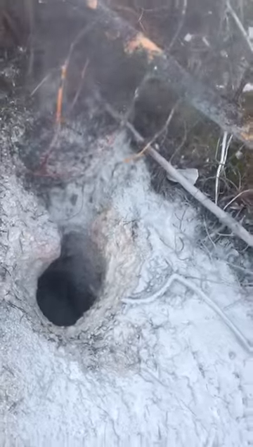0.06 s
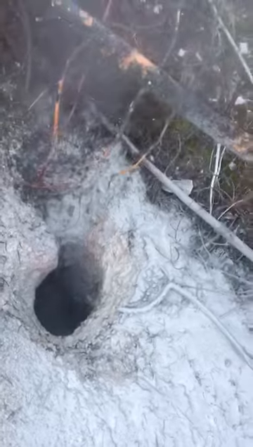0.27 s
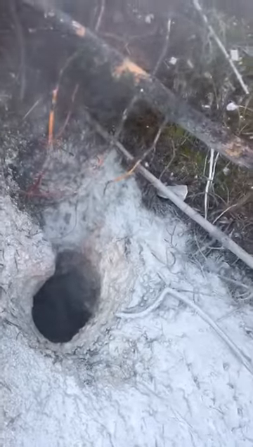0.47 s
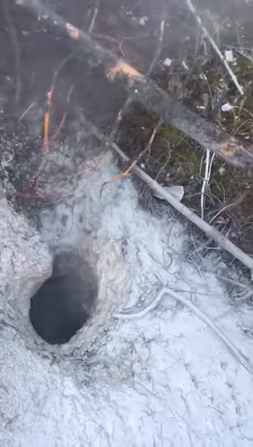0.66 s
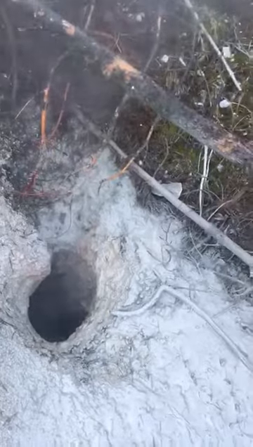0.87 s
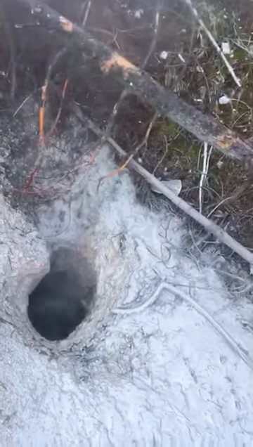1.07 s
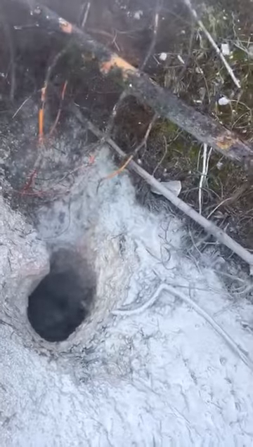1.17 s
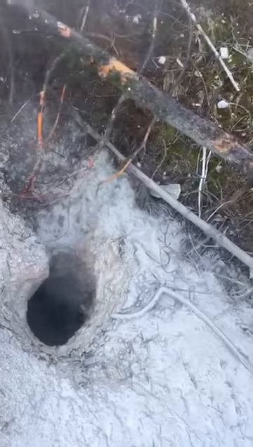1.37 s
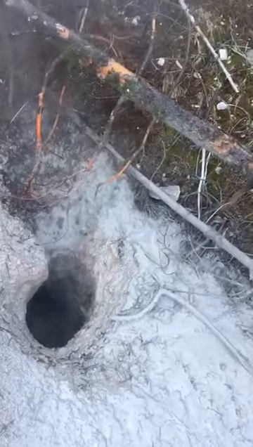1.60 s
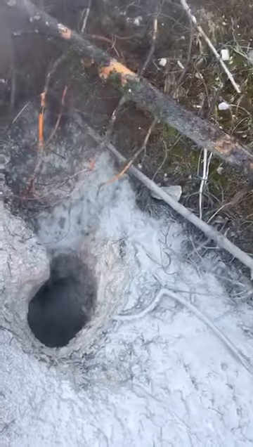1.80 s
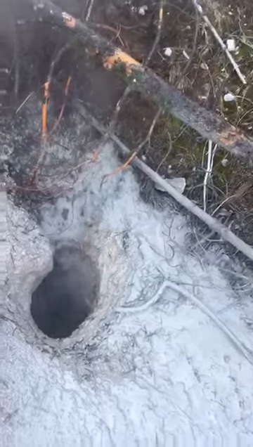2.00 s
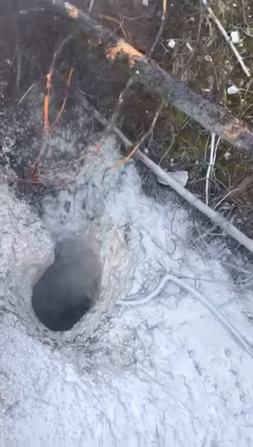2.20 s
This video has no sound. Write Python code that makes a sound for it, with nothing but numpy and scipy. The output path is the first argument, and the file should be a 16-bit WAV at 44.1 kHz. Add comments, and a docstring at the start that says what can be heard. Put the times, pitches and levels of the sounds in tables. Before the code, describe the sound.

A boiling mud pot in a narrow steaming vent outdoors: wet splashes and spits over a simmer, then deep hollow gulps in uneven clusters, with fizzing and steam hiss, heard close from a phone above the rim.

```python
"""Wet mud splashes and spits over a simmer, and soon big steam bubbles heave up with deep gulps.
A mud pot boils at the bottom of a narrow steaming vent, heard from a phone held above its rim.
Gulps are gliding, mostly rising tones that ring the shaft; splashes are short bursts of noise.
Small pops and drops are short rising tones. Steam and spray are bands of noise that swell and sink,
and a low rumble of filtered noise churns deep in the vent."""
import sys
import numpy as np
from scipy import signal
from scipy.io import wavfile
from scipy.ndimage import uniform_filter1d

SR = 44100
rng = np.random.default_rng(int(sys.argv[2]) if len(sys.argv) > 2 else 0)


def int16_out(signal):
    """Quantize to a 16-bit WAV file."""
    q = np.round(np.clip(np.atleast_2d(signal).T, -1, 1) * 32767)
    wavfile.write(sys.argv[1], SR, q.astype(np.int16))


N = 99225  # length in samples
T = np.arange(N) / SR  # time of each sample, s


def undb(db):
    """Turn decibels into a gain."""
    return 10 ** (np.asarray(db) / 20)


def unit(x):
    """Scale a sound to an rms (average strength) of 1."""
    return x / np.sqrt(np.mean(x ** 2))


def band(x, hz, width_hz):
    """Let through one resonance: two poles, gain 1 at the centre."""
    b, a = signal.iirpeak(min(hz, 0.45 * SR), hz / width_hz, fs=SR)
    return signal.lfilter(b, a, x)


def noise():
    """White noise as long as the scene."""
    return rng.standard_normal(N)


def walk(rate_hz):
    """A random wander of rms 1: levels held for 1 / rate_hz, then smoothed twice."""
    hold = int(SR / rate_hz)
    steps = np.repeat(rng.standard_normal(size=1024), hold)[:N]
    return unit(uniform_filter1d(uniform_filter1d(steps, hold), hold))


def add(out, x, start_s):
    """Mix x into out, starting at a given time."""
    i = max(int(start_s * SR), 0)
    out[i:i + len(x)] += x[:max(N - i, 0)]


GULP_DB, GULP_OCTAVE_DB, GULP_RING_DB = -3, -17, -9.5  # trim of all gulps; octave and shaft ring, relative
GULP_WOBBLE_HZ, GULP_ROUGH_DB = 6, 1.2  # rms wander of the pitch and of the level
CHURN_DB, CHURN_HZ, CHURN_LAG_S = -21.5, 200, 0.0083  # mud noise that follows each gulp

# Big steam bubbles; the length runs from the peak to either end, the pitches hold half a length
# before and after the peak, and GULP_DB trims the level:
# (time of peak [s], level [dB], earlier pitch [Hz], later pitch [Hz], length [s])
BIG_BUBBLES = [(0.222, -20.5, 93, 99, 0.069), (0.204, -24, 159, 175, 0.027), (.236, -25, 183, 228, 0.023),
               (.375, -24, 149, 190, 0.04), (.938, -35.5, 565, 600, 0.056),
               (1.948, -30.5, 600, 764, 0.0086), (0.262, -33.5, 273, 317, 0.025),
               (0.287, -36.5, 103, 113, 0.066), (0.388, -13, 96, 99.5, 0.039), (.6, -31, 94, 104, 0.11),
               (0.659, -30, 95, 103, 0.04), (0.782, -29, 307, 345, 0.03), (0.801, -30, 98, 111, 0.047),
               (0.903, -20.5, 106, 117, 0.041), (0.941, -13.5, 75.7, 98.3, 0.053),
               (.968, -20, 139, 189, 0.028), (.99, -21.5, 192, 274, 0.054), (.991, -16, 94, 104, 0.024),
               (1.033, -20, 102, 96, 0.048), (1.021, -22, 186, 203, 0.021), (1.111, -30.5, 86, 96, 0.054),
               (1.049, -25.5, 277, 314, 0.031), (1.393, -23.5, 132, 158, 0.021),
               (1.425, -30.5, 91, 102, 0.06), (1.552, -32.5, 80, 84, 0.061), (1.619, -14, 65.4, 69, 0.031),
               (1.638, -15, 95, 105, 0.021), (1.657, -14.5, 90, 97, 0.036), (1.698, -25, 97, 104, 0.066),
               (1.945, -32.5, 66, 74, 0.07), (2.163, -31, 89, 100, 0.028)]


def gulps():
    """Each big bubble swells and fades on a wavering, gliding tone, churns the mud and rings the shaft."""
    tones, heave = np.zeros(N), np.zeros(N)
    wobble = GULP_WOBBLE_HZ * walk(70)
    for peak_s, db, early_hz, late_hz, length_s in BIG_BUBBLES:
        u = np.linspace(-1, 1, int(2 * length_s * SR))  # 0 at the peak
        waver = np.interp(peak_s + u * length_s, T, wobble)
        pitch = early_hz * (late_hz / early_hz) ** (u + 0.5) + waver
        phase = 2 * np.pi * np.cumsum(pitch) / SR
        phase = phase - phase[len(u) // 2]  # a wave crest lands on the peak
        swell = undb(db + GULP_DB) * np.exp(-(u / 0.38) ** 2)
        tone = np.cos(phase) + undb(GULP_OCTAVE_DB) * np.cos(2 * phase)
        add(tones, swell * tone, peak_s - length_s)
        add(heave, swell, peak_s - length_s + CHURN_LAG_S)
    mud = unit(band(band(noise(), CHURN_HZ, 160), CHURN_HZ, 260))
    churn = mud * undb(CHURN_DB + 0.8 * walk(60.8))
    out = tones * undb(GULP_ROUGH_DB * walk(90)) + heave * churn
    return out + undb(GULP_RING_DB) * shaft(out)


# Resonances of the air in the shaft: (centre [Hz], width [Hz], gain [dB])
SHAFT_RESONANCES = [(63, 62, -7), (96, 61, 0.5), (195, 610, -15.5), (308, 65, -3.5), (601, 95, 6)]


def shaft(x):
    """The air column of the vent rings at a few pitches, added together."""
    return sum(undb(db) * band(x, hz, width_hz) for hz, width_hz, db in SHAFT_RESONANCES)


SPLASH_RISE_S, SPLASH_GROWTH = 0.0041, 0.14  # rise at a table level of -25 dB; louder ones last longer
SPLASH_WIDTH = 0.57  # width of the wet noise, as a part of its centre
SPLASH_DB, SPRAY_DB = -11, 3  # trims added to the two levels in the table

# Mud splashes; each starts 2 ms before its time, spray is relative to the wet noise, both levels
# are before their trims: (time [s], level [dB], centre [Hz], spray level [dB])
MUD_SPLASHES = [(0.023, -27.5, 784, -26), (0.052, -27, 1060, -29), (0.068, -29.5, 1310, -5),
                (0.111, -29.5, 940, -9), (0.248, -27, 706, -6), (0.308, -33, 703, 5),
                (0.403, -23.5, 700, -17), (0.448, -23, 695, -33), (0.539, -30.5, 1330, -19),
                (0.594, -20.5, 1440, -11), (0.742, -22, 1360, -9), (0.761, -24, 1450, -17),
                (0.779, -18.5, 790, -19), (0.789, -29.5, 1500, -1), (0.819, -30.5, 2200, -2),
                (1.021, -23, 1010, -26), (1.035, -17.5, 840, -11), (1.085, -26.5, 1220, -28),
                (1.142, -34, 1120, -28), (1.288, -24, 2250, -5.5), (1.327, -27, 1320, -23),
                (1.357, -17.5, 1390, -37), (1.388, -14.5, 1550, -10), (1.533, -28.5, 1240, 13),
                (1.629, -25, 840, -14), (1.687, -29, 1060, -21), (1.714, -26.5, 806, 2),
                (1.878, -30, 1320, -1), (1.91, -27, 730, -5), (1.996, -27, 1260, -9),
                (2.045, -25.5, 2080, -19), (2.064, -24.5, 710, -7), (2.133, -24, 2580, -11),
                (2.154, -25.5, 2620, -3)]


def splashes():
    """Short bursts of wet noise around a centre, with bright spray on top; each crackles unevenly."""
    crackle = undb(3.5 * walk(400))
    out, t = np.zeros(N), np.arange(int(0.1 * SR)) / SR
    for time_s, db, hz, spray_db in MUD_SPLASHES:
        body_noise, spray_noise, upper_noise = rng.standard_normal(size=(3, len(t)))
        body = unit(band(body_noise, hz, SPLASH_WIDTH * hz))
        upper = unit(band(band(upper_noise, 2.25 * hz, 2 * hz), 2.25 * hz, 2 * hz))
        spray = unit(band(spray_noise, 5440, 5700))
        wet = body + undb(-11.5) * upper + undb(spray_db + SPRAY_DB) * spray
        u = t / (SPLASH_RISE_S * undb(SPLASH_GROWTH * (db + 25)))  # 1 at the top of the shape
        shape = (u * np.exp(1 - u)) ** 1.33
        rough = shape * np.interp(time_s + t, T, crackle) * wet
        # the random crackle must not change the strength of the whole splash
        add(out, undb(db + SPLASH_DB) * unit(rough) * np.sqrt(np.mean(shape ** 2)), time_s - 0.002)
    return out


# How hard the pot boils; fizz and rush add their own trims to slosh and hiss:
# (time [s], slosh level [dB], steam hiss level [dB], rumble level [dB])
BOILING = [(0.0, -45.5, -58, -43), (0.03, -51.5, -50.5, -42.5), (0.18, -47.5, -53, -49.5),
           (0.32, -39, -40, -36), (0.36, -49, -47.5, -44), (0.38, -39, -48, -37), (0.68, -37, -39.5, -43.5),
           (0.71, -42.5, -43.5, -37.5), (0.79, -33, -44, -35), (0.81, -46.5, -43.5, -43),
           (0.91, -47, -53, -33.5), (0.93, -41, -51, -29.5), (1.05, -35, -40.5, -38),
           (1.22, -39.5, -47, -38.5), (1.33, -40, -40.5, -46.5), (1.38, -28, -37, -41),
           (1.42, -34, -34, -40), (1.59, -43.5, -46, -49), (1.7, -40.5, -47, -35.5),
           (1.83, -48, -45.5, -46), (1.94, -40, -48, -36), (2.0, -41, -41.5, -37), (2.11, -47, -45, -44),
           (2.15, -42, -44.5, -50), (2.25, -56.5, -53.5, -46)]
SLOSH, HISS, RUMBLE = 1, 2, 3  # columns


def boil(column):
    """One level of the boiling, drawn as straight lines between the table's times."""
    table = np.array(BOILING)
    return np.interp(T, table[:, 0], table[:, column])


POPS_PER_S, POP_LOW_HZ, POP_HIGH_HZ, POP_CYCLES, POP_DB = 500, 256.5, 7860, 12, -7.5  # dB over slosh
DROPS_PER_S, DROP_LOW_HZ, DROP_HIGH_HZ, DROP_CYCLES, DROP_DB = 1100, 2002, 11450, 12.8, -5.5  # dB over hiss
POP_GLIDE, POP_SPREAD_DB = 0.2, 4  # pitch rise by the end, as a fraction; spread of loudness


def pops(per_s, low_hz, high_hz, cycles, tilt_db):
    """Small bubbles burst at random, each a short, fading, rising tone; rms 1 in all."""
    out = np.zeros(N)
    count = int(per_s * N / SR)
    for when, pitch, size in rng.random(size=(4000, 3))[:count]:
        hz = low_hz * (high_hz / low_hz) ** pitch
        c = np.arange(int(3 * cycles * SR / hz)) * hz / SR  # time in cycles of the starting pitch
        rising = c * (1 + POP_GLIDE * c / cycles / 6)
        tone = np.sin(2 * np.pi * rising) * np.exp(-2 * c / cycles)
        level_db = -POP_SPREAD_DB * np.log(1.02 - size) + tilt_db * pitch  # few are loud
        add(out, undb(level_db) * tone, when * N / SR)
    return unit(out)


def fizz():
    """Bubbles pop in step with the level of the slosh, and fine drops tick along with the hiss."""
    bubbles = pops(POPS_PER_S, POP_LOW_HZ, POP_HIGH_HZ, POP_CYCLES, -2.5)
    drops = pops(DROPS_PER_S, DROP_LOW_HZ, DROP_HIGH_HZ, DROP_CYCLES, -0.25)
    return bubbles * undb(boil(SLOSH) + POP_DB) + drops * undb(boil(HISS) + DROP_DB)


SLOSH_HZ, HISS_HZ = 1080, 4200  # the rush follows slosh below the first, hiss above the second
RUSH_DB, SURGE_DB, FLICKER_DB = -3.5, 0.76, 2.74  # trim; rms of the shared and of the separate wander

# Tone colour of the rush, before its overall level is set: (frequency [Hz], level per Hz [dB])
RUSH_COLOUR = [(240, -32), (400, -7.5), (1340, -3), (1500, -6), (4010, -11.5), (4900, -15.5), (5810, -10),
               (9290, -17), (12000, -4), (13000, -25.5)]


def rush():
    """Steam and spray: third-octave bands of noise that surge together and flicker alone."""
    out, surge, slosh, hiss = 0, walk(13.8), boil(SLOSH), boil(HISS)
    centres = 400 * 2 ** (np.arange(16) / 3)
    table = np.array(RUSH_COLOUR)
    per_hz_db = np.interp(np.log(centres), np.log(table[:, 0]), table[:, 1])
    colour = per_hz_db + 10 * np.log10(centres)  # higher bands are wider, so they hold more power
    power = undb(colour) ** 2
    colour = colour - 10 * np.log10(power[centres > 3000].sum())  # bands above 3 kHz sum to 0 dB
    for hz, db in zip(centres, colour):
        high = np.clip(np.log(hz / SLOSH_HZ) / np.log(HISS_HZ / SLOSH_HZ), 0, 1)
        boil_db = high * hiss + (1 - high) * slosh
        steam = unit(band(band(noise(), hz, hz / 3), hz, hz / 2))
        flicker_db = FLICKER_DB * walk(24.5) + 2.0 * walk(110)
        out = out + steam * undb(db + boil_db + RUSH_DB + SURGE_DB * surge + flicker_db)
    return out


def rumble():
    """Churning mud deep in the vent: low, uneven noise heard through the shaft."""
    deep = signal.lfilter(*signal.butter(2, 350, fs=SR), noise())
    uneven = band(deep, 100, 260) * undb(1.5 * walk(30))
    return unit(shaft(uneven)) * undb(boil(RUMBLE))


def scene():
    """All of the pot, in one channel."""
    return (gulps() + rumble() + splashes() + fizz() + rush())[None]


def record(dry):
    """The phone loses the deepest bass below 35 Hz and cuts the top steeply above 12080 Hz."""
    no_bass = signal.sosfilt(signal.butter(2, 35, "high", fs=SR, output="sos"), dry)
    return signal.sosfilt(signal.ellip(12, 0.3, 80, 12080, fs=SR, output="sos"), no_bass)


dry = scene()
out = record(dry)
int16_out(out)
```